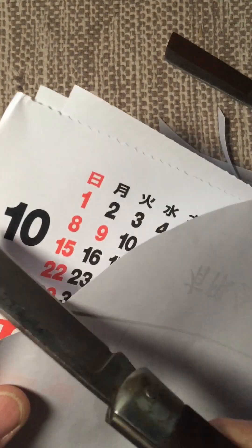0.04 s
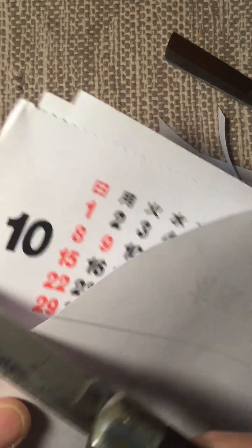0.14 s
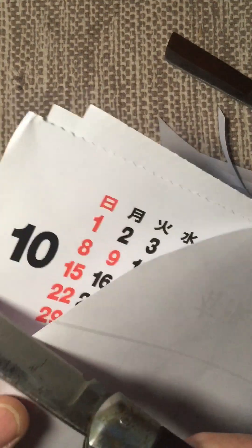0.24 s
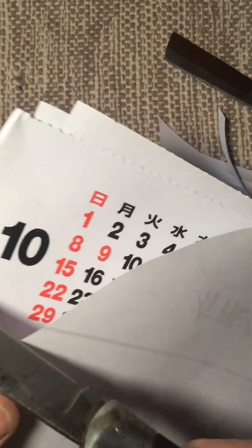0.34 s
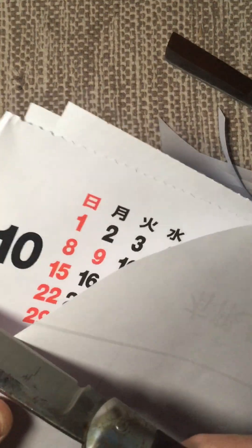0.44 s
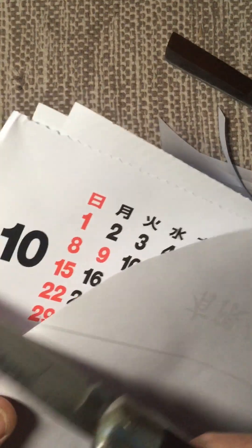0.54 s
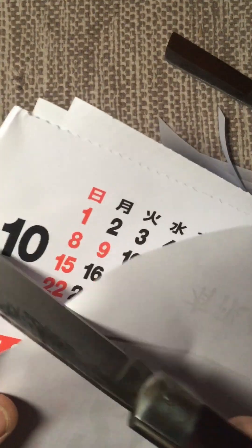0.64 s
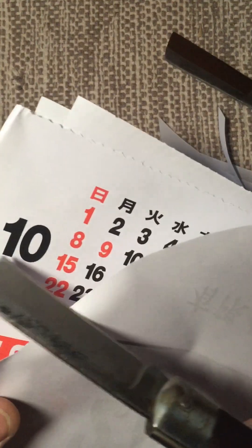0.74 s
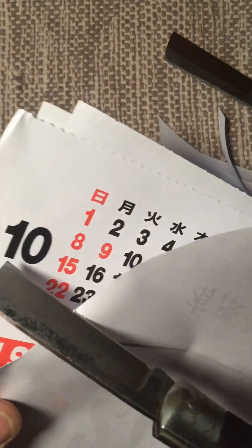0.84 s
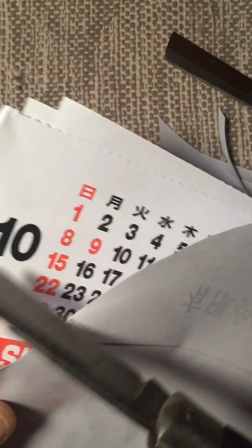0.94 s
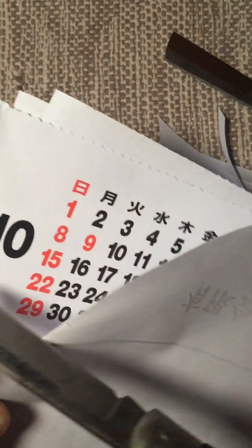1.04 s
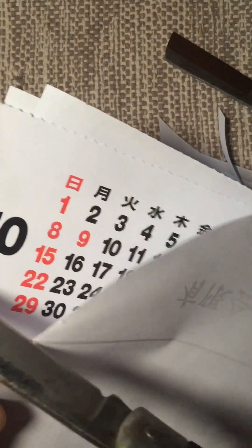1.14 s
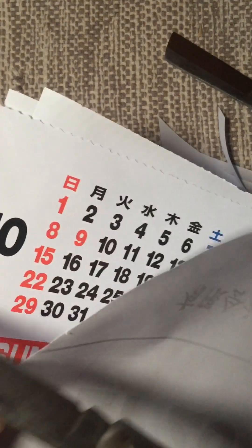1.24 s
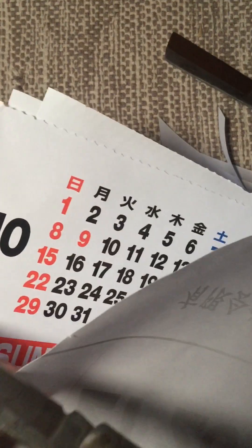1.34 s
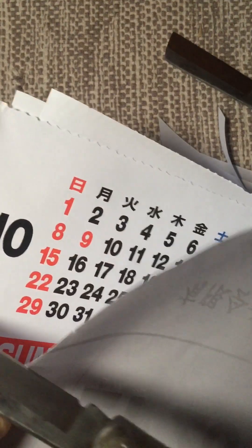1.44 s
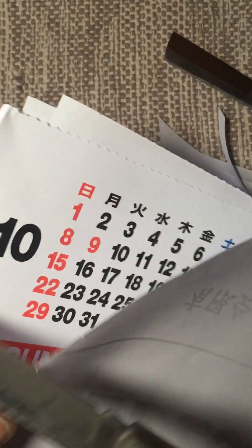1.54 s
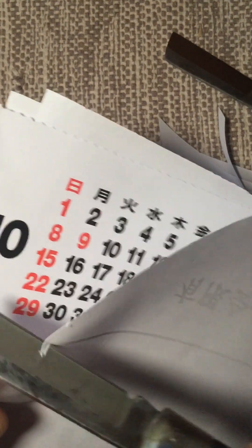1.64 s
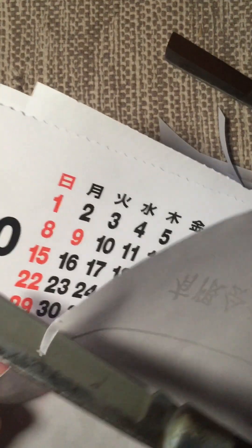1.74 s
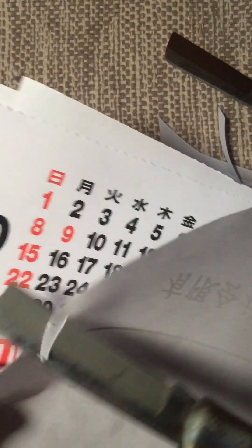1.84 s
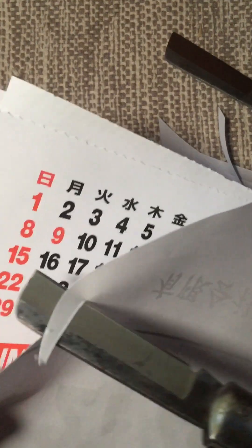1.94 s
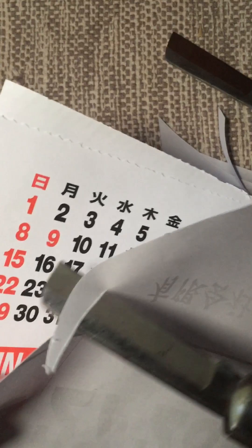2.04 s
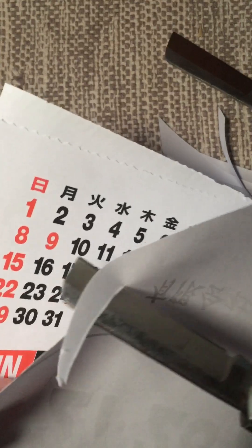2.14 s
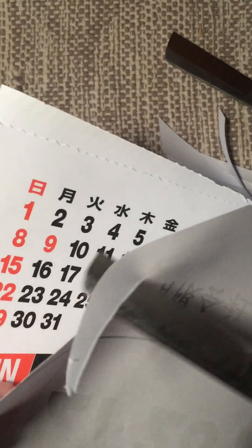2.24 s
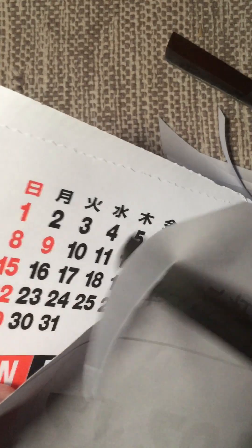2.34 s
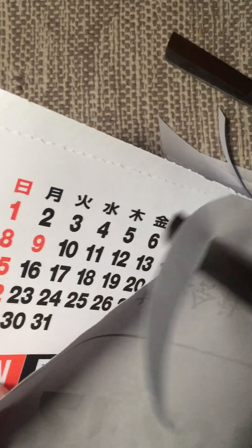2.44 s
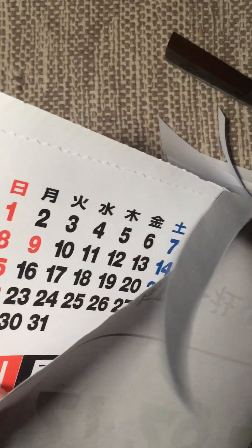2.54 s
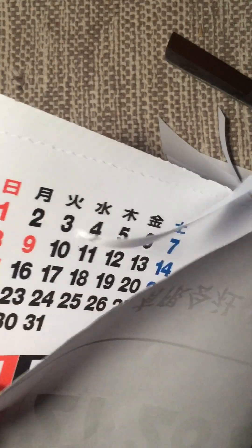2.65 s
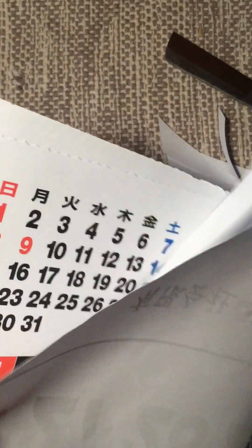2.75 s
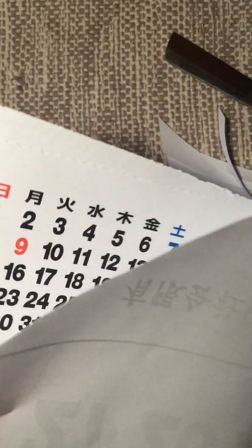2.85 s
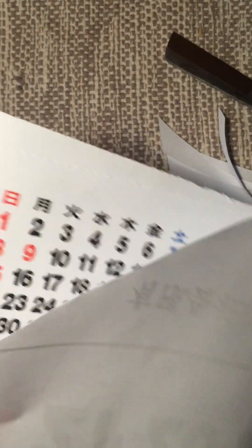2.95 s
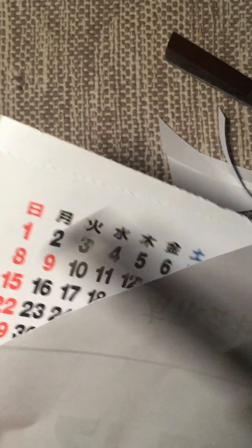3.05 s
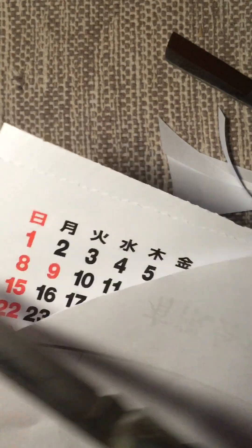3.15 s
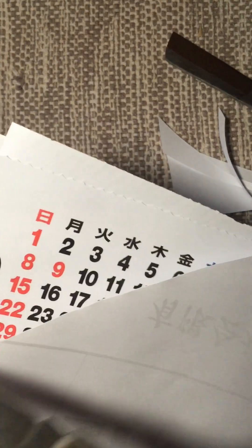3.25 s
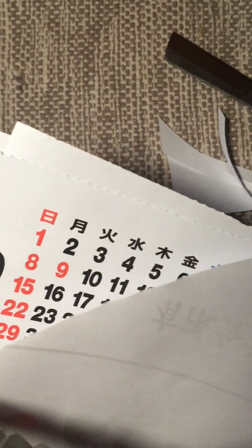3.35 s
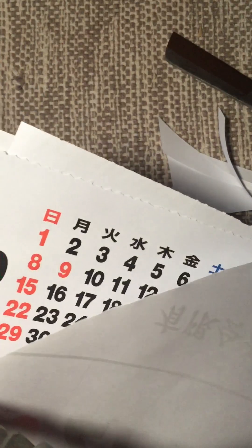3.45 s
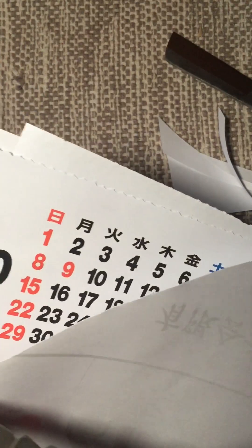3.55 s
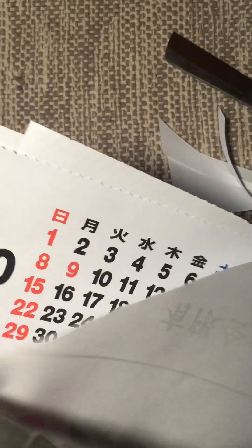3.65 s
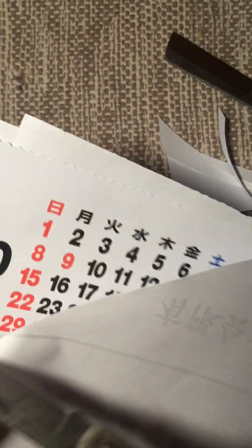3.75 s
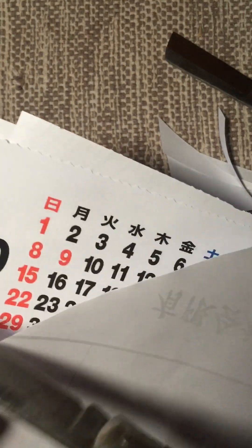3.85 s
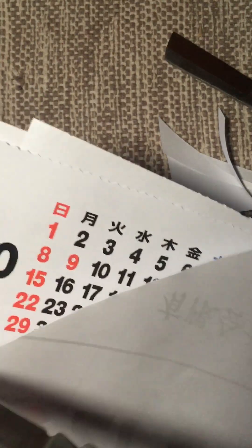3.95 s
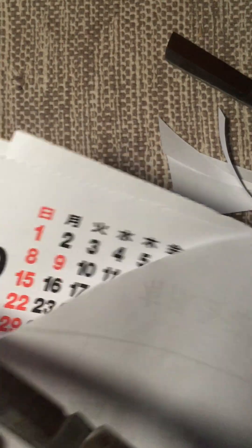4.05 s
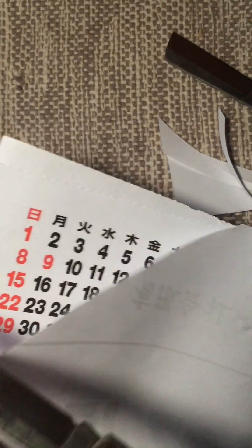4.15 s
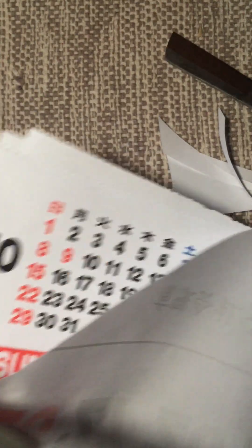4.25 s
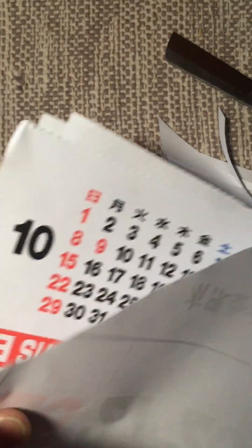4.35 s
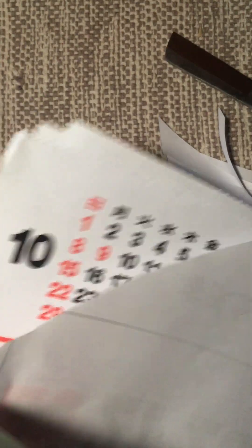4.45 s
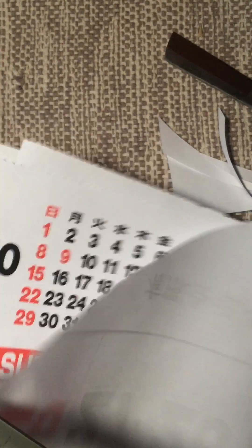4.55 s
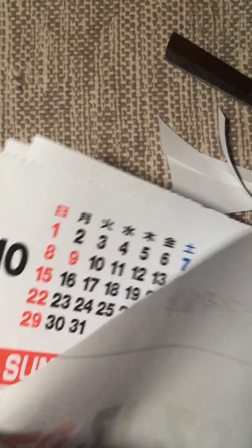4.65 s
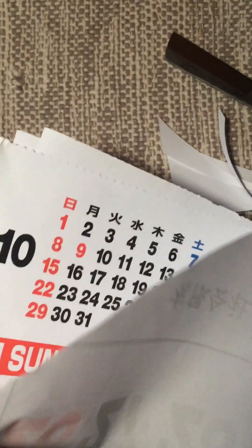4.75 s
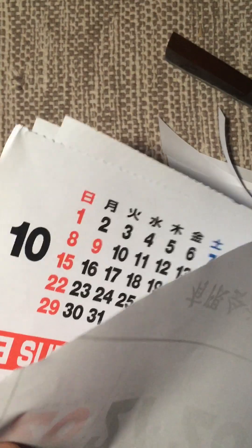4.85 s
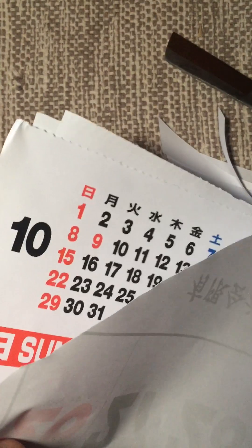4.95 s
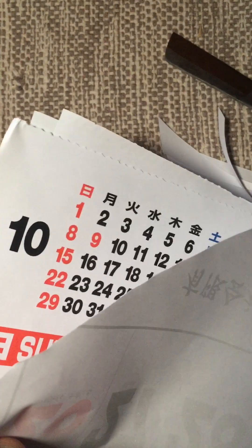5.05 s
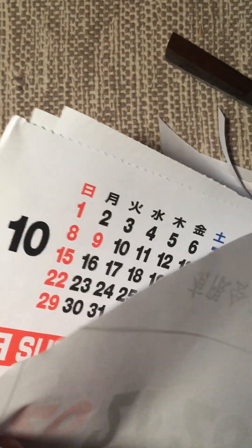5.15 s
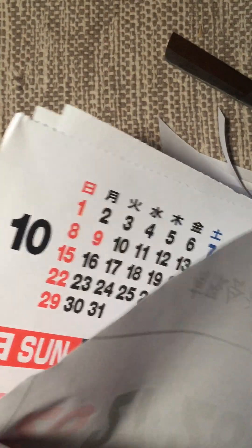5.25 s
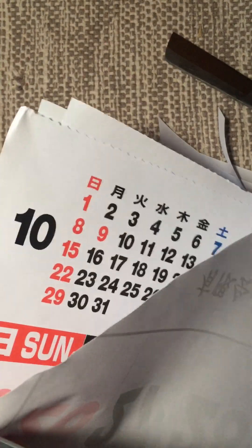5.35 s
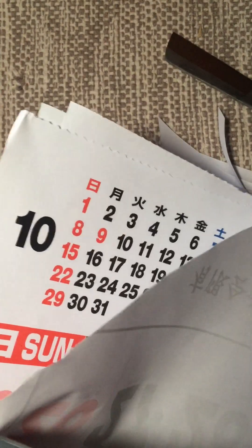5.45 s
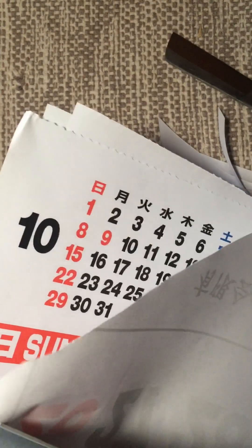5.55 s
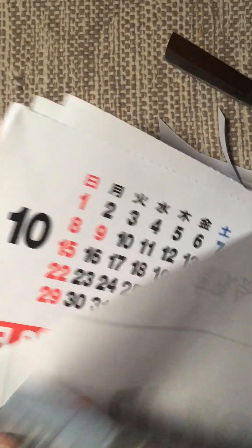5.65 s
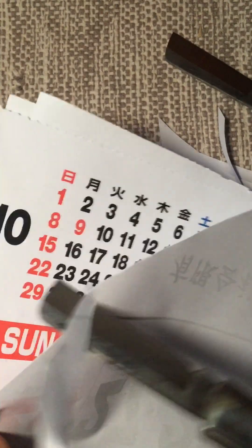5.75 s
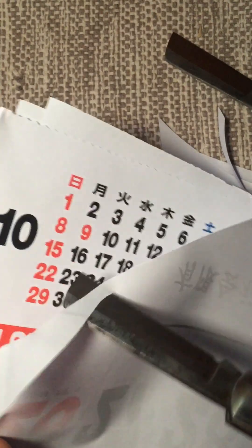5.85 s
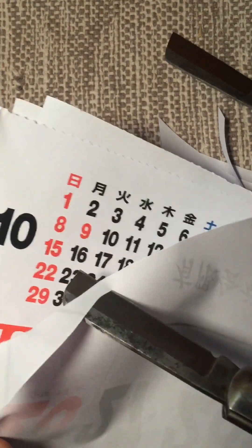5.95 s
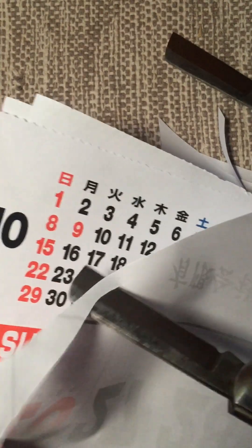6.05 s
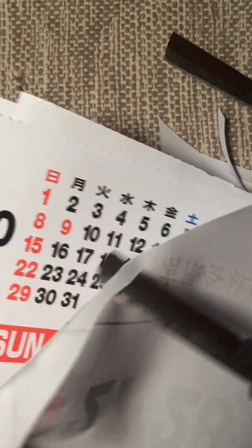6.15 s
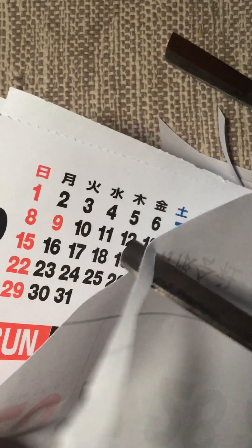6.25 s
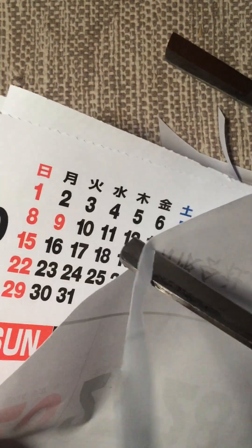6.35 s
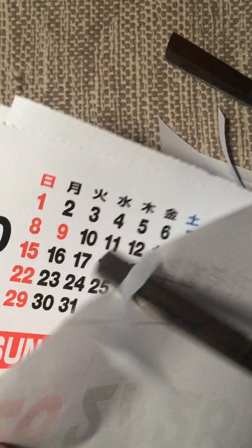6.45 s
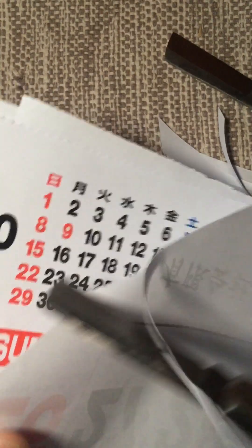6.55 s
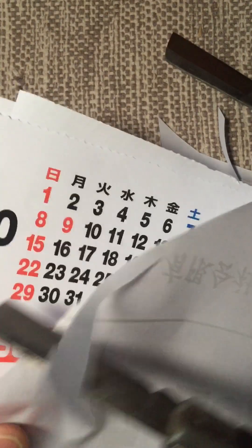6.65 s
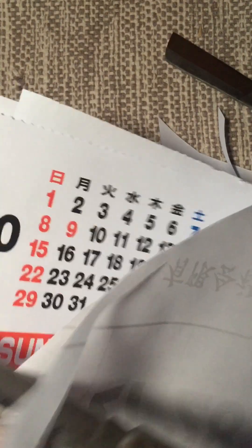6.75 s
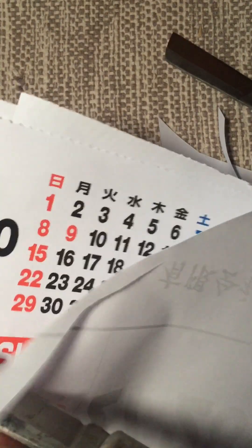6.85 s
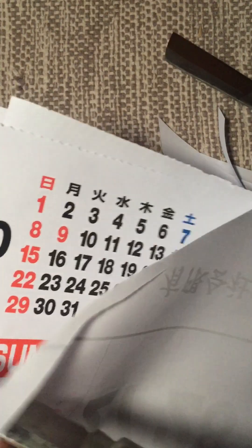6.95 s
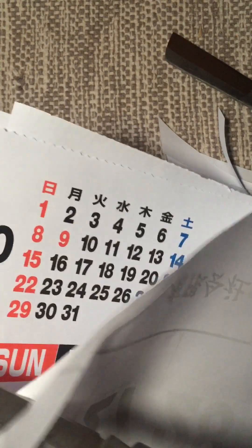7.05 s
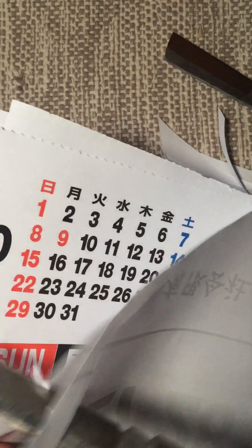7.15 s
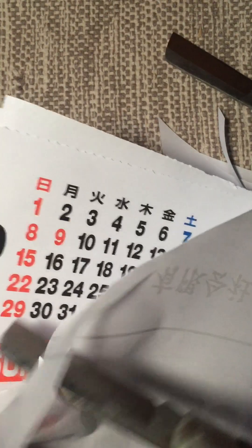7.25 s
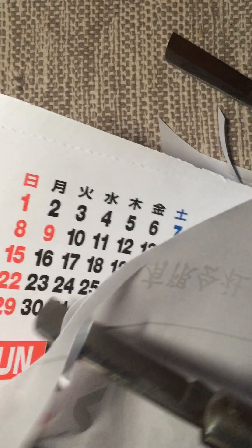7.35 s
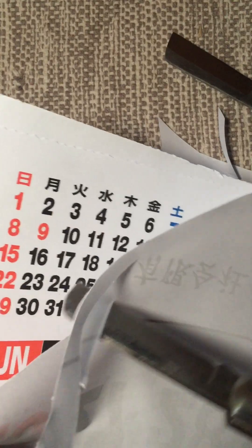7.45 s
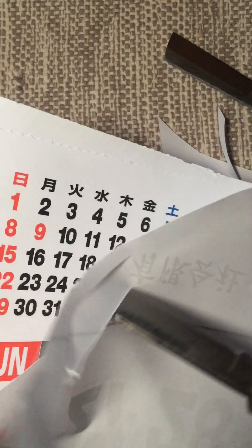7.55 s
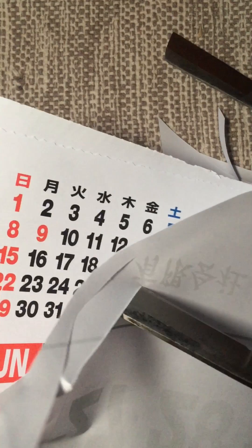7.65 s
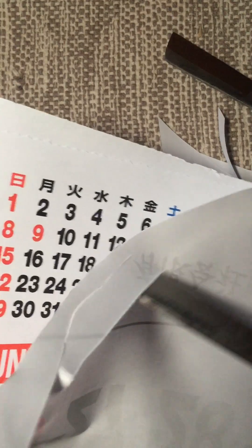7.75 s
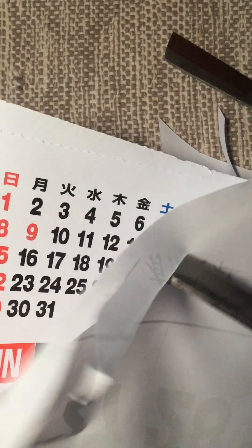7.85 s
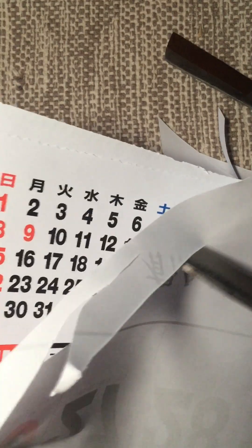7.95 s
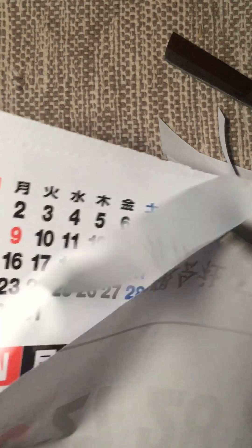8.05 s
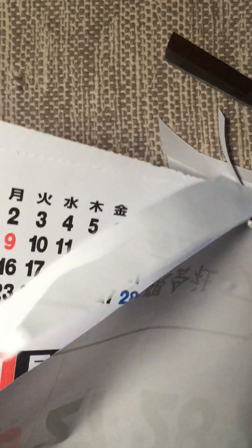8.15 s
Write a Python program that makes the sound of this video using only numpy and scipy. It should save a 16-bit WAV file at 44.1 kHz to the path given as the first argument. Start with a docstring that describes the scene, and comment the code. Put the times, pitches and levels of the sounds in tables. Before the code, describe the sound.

A blade rips crisp strips off a sheet of paper in short bright slices, with dry scrapes, rustles and sharp paper snaps between.

```python
"""A blade slices strips off a sheet of calendar paper held just above a cloth mat, in a quiet small room.
Parting fibres are random impulses over friction noise, filtered by the sheet, its bending and its air gap.
Between the cuts the blade rubs along the paper with sparser fibre noise; nicks tick thinly.
The sheet snaps and buckles as short scattered pulses, and creases crinkle as small damped resonances.
Low bumps and rumble of the hands on the stack, a short room tail and a steady room tone lie beneath."""
import sys
import numpy as np
from scipy import signal
from scipy.fft import rfft, irfft
from scipy.io import wavfile
from scipy.ndimage import uniform_filter1d

SR = 44100
rng = np.random.default_rng(int(sys.argv[2]) if len(sys.argv) > 2 else 0)


def generate_wav(signal):
    """Clip the signal to [-1, 1] and save it as 16-bit WAV at the path in sys.argv[1]."""
    frames = np.transpose(np.atleast_2d(signal))
    scaled = np.clip(frames, -1, 1) * 32767
    pcm = np.round(scaled).astype(np.int16)
    wavfile.write(sys.argv[1], SR, pcm)


N = 362061
TIME = np.arange(N) / SR
FLUTTER_HZ, FIZZ_HZ, TOP_HZ = 900, 5500, 11000   # top of the flutter, foot of the fizz, foot of the top octave

# the long slices, each coloured by the air gap under the lifted sheet:
# [start t/s, end t/s, entry time/s, air-gap f/Hz, air-gap level/dB, flutter level/dB, top-octave level/dB]
SLICES = [(0.618, 0.72, 0.013, 1250, -9, -37, 12), (1.627, 2.259, 0.022, 1957, -19, -42.5, 0),
          (2.282, 2.657, .02, 1780, -10, -40.5, 3), (5.744, 5.977, 0.07, 1110, -7.5, -44.5, 9.5),
          (6.115, 6.378, 0.009, 1290, -10, -40.5, 6), (7.235, 7.697, 0.018, 1100, 2.5, -41.5, 3),
          (7.802, 8.201, 0.016, 2370, -5, -43, -21)]
# rustle of the held sheet as it stirs in the hand: [t/s, level/dB]
HANDLING = [(0, -66), (0.38, -69), (0.57, -73), (1.1, -58.5), (1.3, -65.5), (1.45, -74), (2.82, -60.5),
            (3.0, -53), (3.3, -76.5), (3.65, -72.5), (4.15, -60), (4.7, -50.5), (5.06, -64.5), (5.35, -56),
            (5.48, -68), (6.43, -68), (6.93, -61.5), (7.02, -66)]


def from_db(db):
    """Amplitude ratio of a level: 20 dB to a factor of ten."""
    return 10 ** (np.asarray(db) / 20)


def rms_one(x):
    """Normalisation to unit root-mean-square amplitude."""
    return x / np.sqrt(np.mean(x ** 2) + 1e-20)


def in_time(rows):
    """Linear interpolation of each column of a curve at every sample."""
    times, *columns = np.transpose(rows)
    return [np.interp(TIME, times, column) for column in columns]


def band(x, hz, kind, order=3):
    """Butterworth filtering: a maximally flat passband."""
    sections = signal.butter(order, np.clip(hz, 10, .45 * SR), kind, fs=SR, output="sos")
    return signal.sosfilt(sections, x)


def shaped(x, spectrum):
    """Spectral weighting: a smooth curve over log frequency multiplies the Fourier transform."""
    hz, db = np.transpose(spectrum)
    bins = np.maximum(np.arange(N // 2 + 1) * SR / N, 1)
    gain = from_db(np.interp(np.log(bins), np.log(hz), db))
    return irfft(rfft(x) * gain, N)


def drift(rate):
    """Slow random modulation of unit spread: Gaussian knots, `rate` a second, joined by straight lines."""
    knots = rng.standard_normal(8192)
    return np.interp(TIME * rate, np.arange(len(knots)), knots) * np.sqrt(3 / 2)


def resonance(x, hz, width_hz):
    """Damped two-pole resonance: the pole radius sets the bandwidth, and the peak gain is 1."""
    r = np.exp(-np.pi * width_hz / SR)
    zeros = np.array([1, 0, -1]) * (1 - r * r) / 2
    poles = [1, -2 * r * np.cos(2 * np.pi * hz / SR), r * r]
    return signal.lfilter(zeros, poles, x)


def sheet_colour(x):
    """Modal colouration: fixed peaks and notches act one after another."""
    # resonances and notches of sheet and table top: [f/Hz, width/Hz, level/dB]
    sheet_modes = [(358, 41, 3.5), (650, 60, 7), (900, 230, -4), (1570, 98, 5), (4950, 480, -2),
                   (7710, 600, -5.5), (9400, 1600, 0.5), (10400, 560, -6.5)]
    for hz, width_hz, db in sheet_modes:
        x = x + (from_db(db) - 1) * resonance(x, hz, width_hz)
    return x


def room_tone(level_db=-60.5, rumble_hz=160, rumble_width_hz=90, waver_db=4.0, waver_rate=14):
    """Stationary filtered noise: a soft steady hiss over a low rumble that wavers."""
    # spectrum of the room tone: [f/Hz, relative density level/dB]
    air_spectrum = [(25, -3), (44, -14.5), (66, -5), (134, -6), (200, -2.5), (285, -22), (439, -18),
                    (3080, -36.5), (10400, -54.5), (16000, -50.5)]
    air = shaped(rng.standard_normal(N), air_spectrum)
    waver = from_db(waver_db * drift(waver_rate))
    air = air + (waver - 1) * resonance(air, rumble_hz, rumble_width_hz)
    return from_db(level_db) * rms_one(air)


def hands(low_hz=46, high_hz=190, level_db=-56.5, follows=0.33):
    """Amplitude-modulated low noise: uneven shoves on the stack rumble more as the rustle grows."""
    rustle_db, = in_time(HANDLING)
    shoves_db = 4 * np.tanh(drift(12))
    noise = band(rng.standard_normal(N), [low_hz, high_hz], "band")
    rumble = rms_one(noise * from_db(shoves_db))
    # level_db holds at the strongest rustle; the rumble follows a share of the rustle's swing
    return rumble * from_db(level_db + follows * (rustle_db - rustle_db.max()))


def crinkles(per_s=110, spread_db=4, above_rustle_db=-1, width_share=0.45, count=6):
    """Random impulse excitation: tiny creases give way at random, each with a short damped ring."""
    pitches = np.geomspace(900, 5000, count)
    sizes = from_db(spread_db * np.minimum(rng.exponential(1, N), 3))
    creases = sizes * (rng.random(N) < per_s / SR)
    dealt = rng.integers(0, count, N)   # the pitch that each crease excites
    rings = 0
    for k, hz in enumerate(pitches):
        excitation = creases * (dealt == k) + 1e-18
        rings = rings + resonance(excitation, hz, width_share * hz) / np.sqrt(hz)
    rustle_db, = in_time(HANDLING)
    dulled = band(sheet_colour(rings), FIZZ_HZ, "low", order=1)
    return rms_one(dulled) * from_db(rustle_db + above_rustle_db)


def bumps():
    """Damped free vibration: the stack of paper on its mat answers with one low decaying note."""
    # soft bumps of the hand on the stack: [t/s, peak level before the high-pass/dB, f/Hz, 60 dB decay/s]
    bump_rows = [(3.475, -40.5, 133, 0.14), (3.785, -28, 144, 0.04), (4.635, -19, 177, 0.029),
                 (6.65, -47, 105, 0.11), (7.613, -30, 166, 0.086), (8.113, -35.5, 135, 0.23)]
    out = np.zeros(N)
    for start, db, hz, t60 in bump_rows:
        t = np.clip(TIME - start, 0, 1)
        out += np.sin(2 * np.pi * hz * t) * from_db(db - 60 * t / t60)
    return band(out, 150, "high", order=2)


def burst(t, t60, scatter, give_s):
    """Impulse and scattering: a sharp release, then the crease runs on and reflections die in the sheet."""
    decay = from_db(-60 * t / t60)
    onset = (1 - np.exp(-t / give_s)) ** 2
    return (t == 0) + scatter * rng.standard_normal(len(t)) * decay * onset


def snaps(ring_db=-1.23, crack_db=-11, thud_db=-2.0, softening=0.88, width_share=0.44,
          echo_s=0.00135, echo_share=0.076):
    """Buckling instability: stored bending energy rings in one band; harder snaps crack quicker and cleaner."""
    # snaps and buckles of the sheet, and at 1.618 s and 6.116 s the sharp bite as the blade enters a slice: #
    # [t/s, level/dB, lowest ring f/Hz, highest ring f/Hz, thud level before the common thud_db/dB]
    snap_rows = [(0.4567, -41, 740, 3000, 3.5), (1.078, -36.5, 1000, 4000, -4.5),
                 (1.261, -38.5, 780, 2780, -2), (1.3088, -40.5, 900, 3250, -2.5),
                 (1.347, -31, 1090, 3180, -7.5), (1.618, -32, 1280, 4970, -11),
                 (2.6805, -24, 1300, 5630, -9.5), (2.9286, -31.5, 830, 4030, -23),
                 (2.984, -40, 2000, 5900, -12), (3.0112, -35.5, 900, 3500, -19),
                 (3.167, -43.5, 740, 1490, -14.5), (3.684, -16, 1540, 3060, -30.5),
                 (3.7844, -12.5, 2450, 4430, -13), (4.008, -15.5, 2270, 5740, -14.5),
                 (4.117, -42, 900, 3800, -5), (4.392, -35, 596, 2200, -5.5),
                 (4.528, -33.5, 620, 3150, -3.5), (4.634, -31.5, 1210, 5370, -4),
                 (4.658, -39, 700, 1990, -6), (4.677, -31.5, 760, 2850, -10),
                 (4.721, -26.5, 900, 2780, -19), (5.424, -34.5, 880, 2580, -15),
                 (5.541, -33, 900, 3760, -21), (6.116, -24.5, 1180, 4960, -12),
                 (7.036, -35.5, 950, 2420, -17), (7.163, -19, 745, 6000, -13)]
    # thin ticks as the edge nicks the paper, all in one band: [t/s, level/dB]
    tick_rows = [(0.9463, -33), (0.9623, -37.5), (0.974, -50), (2.733, -31), (2.786, -48), (2.852, -47),
                 (2.882, -44.5), (2.9904, -51.5), (3.4492, -45), (3.973, -46), (5.231, -33.5), (5.267, -39),
                 (5.374, -46.5), (5.3995, -32), (5.708, -28)]
    tick_low_hz, tick_high_hz, tick_thud_db = 2120, 13100, -19
    ticks = [(at_s, db, tick_low_hz, tick_high_hz, tick_thud_db) for at_s, db in tick_rows]
    out, t = np.zeros(N + SR), np.arange(SR // 10) / SR
    hardest_db = max(row[1] for row in snap_rows)
    for at_s, db, low_hz, high_hz, thud in list(snap_rows) + ticks:
        softness = from_db(softening * (hardest_db - db))
        # a soft buckle gives way gradually, the more slowly the lower it rings
        give_s = .0002 * softness * 1350 ** 2 / (low_hz * high_hz)
        decay_s = 0.016 * np.sqrt(1500 / low_hz)   # low modes last longer
        pulse = burst(t, t60=decay_s, scatter=.075 * softness, give_s=give_s)
        ring = band(sheet_colour(pulse), low_hz, "high", order=4)
        ring = band(ring, high_hz, "low", order=4)
        # an all-pass: slow bending waves make the lows lag behind
        ring = ring - 2 * resonance(ring, low_hz, width_share * low_hz)
        # echo from the sheets below
        ring = ring + echo_share * np.interp(t - echo_s, t, ring, left=0)
        crack = band(pulse, [high_hz / 2, TOP_HZ], "band", order=2)
        low = burst(t, t60=0.12, scatter=0.092, give_s=give_s)
        low = band(low, [230, 1250], "band", order=2)
        snap = rms_one(ring) * from_db(ring_db)
        snap += rms_one(crack) * from_db(crack_db) / softness ** 2
        snap += rms_one(low) * from_db(thud + thud_db)
        at = round((at_s - give_s / 2) * SR)
        # nearly all the energy lies in the first tenth of the window
        out[at:at + len(t)] += snap * from_db(db) / np.sqrt(10)
    return out[:N]


def fibres(per_s, spread_db, hiss, judder_db, judder_rate):
    """Stick-slip fracture: fibres break at random over smooth friction noise, both clumped by a judder."""
    sizes = from_db(spread_db * np.minimum(rng.exponential(1, N), 4)) * rng.choice([-1, 1], N)
    breaks = rms_one(sizes * (rng.random(N) < per_s / SR))
    friction = hiss * rng.standard_normal(N)
    return rms_one((breaks + friction) * from_db(judder_db * drift(judder_rate)))


def singing(x, width_share=0.16):
    """Transient resonance: strip and free sheet ring as their length passes through a resonance."""
    # swells of the strip and free sheet: [peak t/s, swell time/s, f/Hz, peak level/dB]
    ring_rows = [(.33, 0.3, 3040, 10.5), (0.72, 0.079, 2620, 5), (0.681, 0.076, 6200, 3.5),
                 (1.9, 0.53, 2650, 4.5), (1.8, 0.17, 8600, 13), (1.95, .04, 6560, 9.5),
                 (2.22, 0.14, 4850, 8), (2.35, 0.1, 8500, 8), (2.46, .06, 15200, 7.5),
                 (2.533, 0.18, 4250, 13.5), (2.6, .16, 2490, 12.5), (5.28, 0.24, 4360, 7),
                 (5.78, 0.098, 10600, 9), (5.78, .05, 7840, 10), (6.25, 0.25, 2170, 5.5),
                 (7.32, 0.1, 3450, 16.5), (7.35, 0.16, 4430, 14.5), (7.32, 0.064, 9400, 8),
                 (7.51, 0.045, 11700, 9), (7.55, 0.14, 6800, 6.5), (7.6, 0.44, 2020, 6),
                 (8.0, 0.35, 2970, 10.5), (7.87, 0.14, 15200, 10.5), (7.88, 0.1, 10500, 5.5),
                 (8.17, 0.14, 9400, 5.5), (8.15, .06, 6900, 3)]
    out = x.copy()
    for peak_s, swell_s, hz, db in ring_rows:
        on = np.abs(TIME - peak_s) < 2 * swell_s
        swell = np.exp(-((TIME[on] - peak_s) / swell_s) ** 2)
        out[on] += (from_db(db * swell) - 1) * resonance(x[on], hz, width_share * hz)
    return out


def hollowed(x, width_hz=330):
    """Cavity colouration and directivity: the air gap alters one band, the strip's facing the top octave."""
    out, top = x.copy(), x - band(x, TOP_HZ, "low", order=1)
    for start, end, _, hz, db, _, top_db in SLICES:
        on = (TIME > start) & (TIME < end)
        out[on] += (from_db(db) - 1) * resonance(x[on], hz, width_hz)
        out[on] += (from_db(top_db) - 1) * top[on]
    return out


def bending_modes(x, depth_db, width_share, bend_rate, count=22):
    """Modal directivity: as the sheet bends, each mode turns to the microphone or away and swells or fades."""
    out = x.copy()
    centres = np.linspace(np.sqrt(1500), np.sqrt(15000), count) ** 2
    for hz, spacing_hz in zip(centres, np.gradient(centres)):
        # high modes beam more narrowly
        swell_db = depth_db * np.sqrt(hz / centres[-1]) * drift(bend_rate)
        out += (from_db(swell_db) - 1) * resonance(x, hz, width_share * spacing_hz)
    return out


def off_the_table(x, lag_ms, sway, share):
    """Comb filtering: an echo from the sheets below, its delay swaying at random with the moving hand."""
    lag = lag_ms * SR / 1000 * np.exp(sway * drift(2.5))
    samples = np.arange(N)
    return x + share * np.interp(samples - lag, samples, x)


def evened(x, size=3600):
    """Level normalisation: a moving rms over a twelfth of a second is held near 1."""
    return x / np.sqrt(uniform_filter1d(x ** 2, size=size) + 1e-12)


def rubbing(waver_db=4.5, drop_db=14, roundness=1.67):
    """Sliding friction: gains of flutter, bite and fizz for rounded swells over the rustle, summed as power."""
    # the flat of the blade rubs along the paper:
    # [peak t/s, swell time/s, fade time/s, peak level/dB, fizz level relative to it/dB]
    rub_rows = [(0.025, 0.13, 0.043, -35.5, -10), (.087, 0.011, 0.017, -48.5, -8),
                (.147, .007, .015, -48, -20), (0.222, 0.029, 0.076, -47.5, -5),
                (.39, 0.13, 0.053, -57.5, -27), (0.424, 0.01, 0.054, -44, -1.5),
                (0.52, 0.087, 0.011, -46, -11), (0.80, 0.033, 0.041, -34.5, -9),
                (0.842, 0.03, 0.013, -30.5, -3.5), (1.075, 0.06, 0.015, -39, -2.5),
                (1.123, 0.0028, 0.026, -41, -8), (1.16, 0.019, 0.034, -42, -13),
                (1.491, 0.025, 0.014, -41, -11), (1.515, 0.0085, 0.024, -36.5, -6),
                (3.06, 0.08, 0.095, -56, -15), (3.19, 0.05, 0.036, -53.5, -3.5),
                (3.70, 0.007, 0.074, -38.5, -12), (3.773, 0.035, 0.043, -27, 8),
                (3.868, 0.083, 0.031, -24.5, -2), (4.06, 0.13, 0.095, -49, -5),
                (4.17, 0.093, 0.052, -44.5, -5.5), (4.29, 0.015, 0.064, -47.5, -4.5),
                (4.44, 0.16, 0.027, -47, -8), (4.59, 0.05, 0.071, -42, -5),
                (4.607, 0.0098, 0.008, -32.5, -6), (4.775, 0.056, 0.045, -40, -3),
                (5.155, 0.022, 0.018, -48, 1), (5.219, 0.023, 0.027, -28.5, -1.5),
                (5.292, 0.014, 0.016, -32, -1.5), (5.507, 0.0034, 0.045, -44.5, -14),
                (5.565, 0.024, 0.0098, -37, -3), (5.596, 0.016, 0.028, -23.5, -1.5),
                (5.698, 0.072, 0.009, -31.5, -1.5), (6.041, 0.029, 0.02, -42, -11),
                (6.515, 0.036, 0.12, -41, -2), (6.657, 0.028, 0.035, -36.5, -4),
                (6.72, 0.065, 0.064, -36, -1), (6.834, 0.1, 0.093, -35.5, -9.5),
                (7.049, .005, 0.0076, -31, -14), (7.068, 0.016, 0.037, -31, -7),
                (7.088, 0.0044, 0.0054, -30.5, 1), (7.17, 0.087, 0.069, -48.5, -5)]
    rustle_db = in_time(HANDLING)[0] + waver_db * drift(35)
    rustle_bands_db = np.array([[-10], [0], [-4.5]])   # flutter, bite, fizz relative to the rustle
    power = from_db(rustle_db + rustle_bands_db) ** 2
    mean_db = np.mean([db for *_, db, _ in rub_rows])
    for peak_s, swell_s, fade_s, db, fizz_db in rub_rows:
        away = np.maximum((peak_s - TIME) / swell_s, (TIME - peak_s) / fade_s)
        on = away < 4
        flutter_db = -52 + 0.7 * (db - mean_db)   # -52 dB in a rub of mean strength
        levels_db = np.array([[flutter_db], [db], [db + fizz_db]])
        # drop_db is lost over one swell or fade time
        power[:, on] += from_db(levels_db - drop_db * away[on] ** roundness) ** 2
    return np.sqrt(power)


def slicing(entry_rise_db=29, release_db_per_s=1003, flutter_grows_db_per_s=7.5, flutter_follows=0.22):
    """Driven cutting: gains of flutter, bite and fizz rise at entry, follow the pull and die at release."""
    # the pull of the blade, one curve for each slice: [t/s, bite level/dB, fizz level relative to the bite/dB]
    pull_curves = [
        [(0.618, -35, -3), (0.651, -20.5, -11), (0.693, -20, -12), (0.718, -30.5, -11)],
        [(1.62, -28.5, -5), (1.675, -20.5, -2), (1.759, -30.5, -6), (1.799, -24.5, -4.5), (1.96, -24, -0.5),
         (2.011, -29, -0.5), (2.141, -26, -2), (2.255, -34, 5.5)],
        [(2.283, -26.5, -0.5), (2.301, -25, 2), (2.367, -31, 6.5), (2.429, -24.5, 3.5), (2.51, -25.5, 3.5),
         (2.61, -22.5, -5), (2.66, -23, -1.5)],
        [(5.738, -19, 2.5), (5.77, -16, -2), (5.818, -18.5, -4.5), (5.88, -25, -7), (5.904, -30, -7),
         (5.954, -22.5, -3.5), (5.968, -31, -1.5)],
        [(6.118, -24, 1.5), (6.146, -20, -5), (6.158, -28.5, -10), (6.178, -20.5, -6), (6.248, -23.5, -4),
         (6.298, -21.5, -3.5), (6.342, -25.5, -5), (6.375, -33.5, -1.5)],
        [(7.238, -22, -1.5), (7.258, -15.5, -9), (7.28, -26, -1.5), (7.31, -19.5, 0), (7.38, -21.5, 1),
         (7.46, -24.5, -2), (7.528, -25.5, 0), (7.62, -24.5, -6.5), (7.698, -30.5, 4)],
        [(7.805, -26, 5), (7.895, -22, -1.5), (7.967, -27.5, -3.5), (8.029, -28, 1), (8.121, -20.5, 0),
         (8.175, -27.5, 11.5), (8.19, -22.5, -1.5)],
    ]
    power = np.zeros((3, N))
    for (start, end, entry_s, _, _, flutter_db, *_), pull in zip(SLICES, pull_curves):
        bite_db, fizz_db = in_time(pull)
        entry_db = entry_rise_db * np.maximum(start - TIME, 0) / entry_s
        edges_db = entry_db + release_db_per_s * np.maximum(TIME - end, 0)
        on = edges_db < 60
        swing_db = bite_db - np.mean([row[1] for row in pull])
        # the lengthening strip flutters more
        growth_db = flutter_grows_db_per_s * (TIME - (start + end) / 2)
        flutter_level_db = flutter_db + growth_db + flutter_follows * swing_db
        levels_db = np.array([flutter_level_db, bite_db, bite_db + fizz_db])
        power[:, on] += from_db(levels_db[:, on] - edges_db[on]) ** 2
    return np.sqrt(power)


def blade(lowest_hz=105, surge_db=0.65, surge_rate=55):
    """Source-filter principle: fibre noise passes through the sheet, then three bands take their own gains."""
    # spectrum of paper being cut: [f/Hz, relative density level/dB]
    cut_spectrum = [(59, -56), (100, -24.5), (330, -8.5), (634, -11.5), (950, -8.5), (1600, 1), (2990, 1),
                    (4870, -6), (9020, -2.5), (15000, -5.5), (16000, -5.5)]
    # spectrum of paper being rubbed: [f/Hz, relative density level/dB]
    rub_spectrum = [(59, -34.5), (100, -15.5), (229, -23), (328, -13), (481, -22), (950, -8.5), (2420, 8),
                    (5770, 1), (8500, 1), (16000, -3.5)]
    cut = fibres(per_s=11000, spread_db=2.5, hiss=0.9, judder_db=0.82, judder_rate=210)
    cut = hollowed(singing(shaped(cut, cut_spectrum)))
    cut = bending_modes(cut, depth_db=3.4, width_share=.55, bend_rate=22.0, count=44)
    cut = bending_modes(cut, depth_db=2.2, width_share=.6, bend_rate=14.0, count=16)
    cut = cut * from_db(surge_db * drift(surge_rate))   # the edge advances in small surges
    rub = fibres(per_s=900, spread_db=2.0, hiss=1.03, judder_db=2.0, judder_rate=120)
    rub = singing(shaped(rub, rub_spectrum))
    rub = bending_modes(rub, depth_db=3.6, width_share=.6, bend_rate=12.0, count=40)
    out = 0
    for source, gains in ((cut, slicing()), (rub, rubbing())):
        flutter_gain, bite_gain, fizz_gain = gains
        paper = off_the_table(sheet_colour(source), lag_ms=1.099, sway=0.279, share=0.3)
        paper = band(paper, lowest_hz, "high", order=2)   # a thin sheet radiates little bass
        flutter = evened(band(paper, FLUTTER_HZ, "low", order=5)) * flutter_gain
        bite = evened(band(paper, [FLUTTER_HZ, FIZZ_HZ], "band", order=4)) * bite_gain
        fizz = evened(band(paper, FIZZ_HZ, "high", order=5)) * fizz_gain
        out = out + flutter + bite + fizz
    return out


def room(x, wet_db, t60, wall_hz):
    """Diffuse reverberation: soft furnishings leave a faint, dull tail of decaying noise."""
    t = np.arange(SR // 2) / SR
    tail = rng.standard_normal(len(t)) * (t > .005) * from_db(-60 * t / t60)
    tail = band(tail, wall_hz, "low", order=1)
    tail = tail / np.sqrt(np.sum(tail ** 2))
    return x + from_db(wet_db) * signal.fftconvolve(x, tail)[:N]


def scene():
    """Superposition: the paper and its room tail add to hands and room tone, alike in both channels."""
    paper = blade() + snaps() + crinkles() + bumps()
    paper = room(paper, wet_db=-17.0, t60=0.063, wall_hz=3500)
    return np.tile(paper + hands() + room_tone(), (2, 1))


def record(dry):
    """Band limiting: the small microphone loses deep bass, full scale clips the peaks, and the top is cut."""
    heard = np.clip(band(dry, 38, "high", order=6), -1, 1)
    top_cut = signal.ellip(10, .1, 70, 15800, fs=SR, output="sos")   # 0.1 dB ripple, 70 dB down, 15800 Hz
    return signal.sosfilt(top_cut, heard)


dry = scene()
out = record(dry)
generate_wav(out)
```